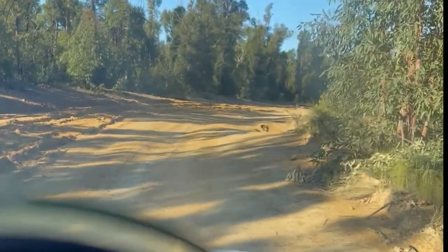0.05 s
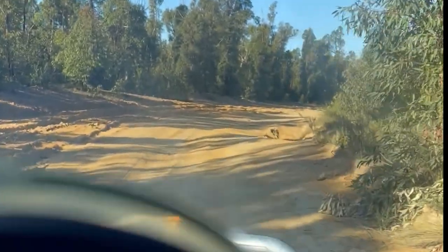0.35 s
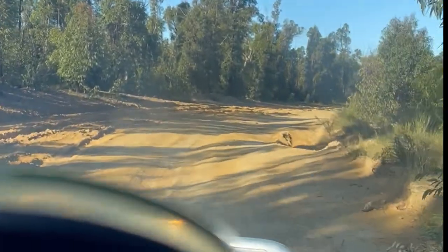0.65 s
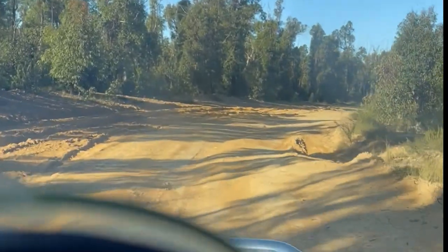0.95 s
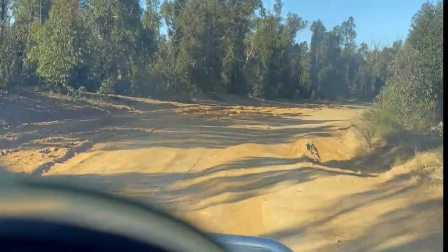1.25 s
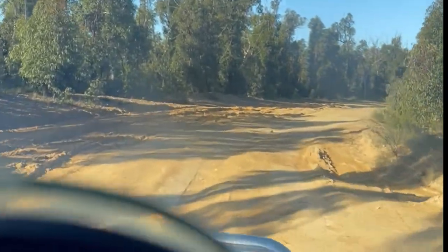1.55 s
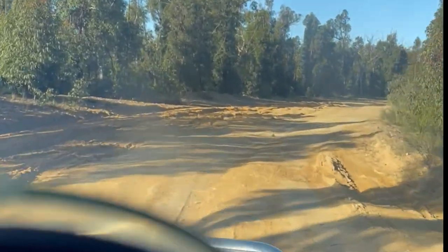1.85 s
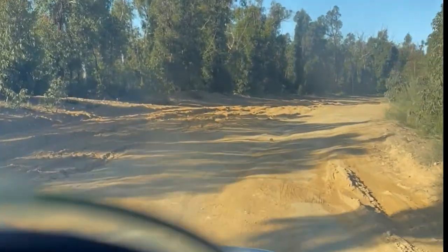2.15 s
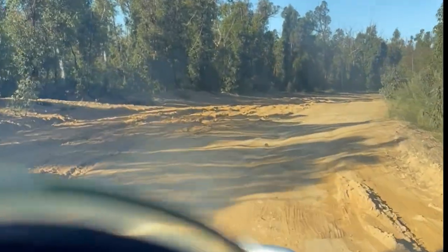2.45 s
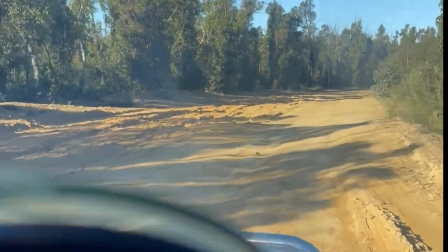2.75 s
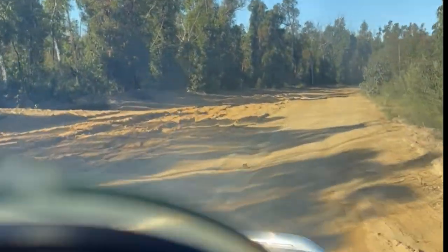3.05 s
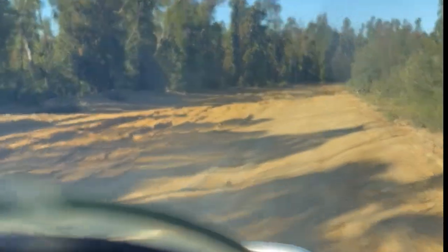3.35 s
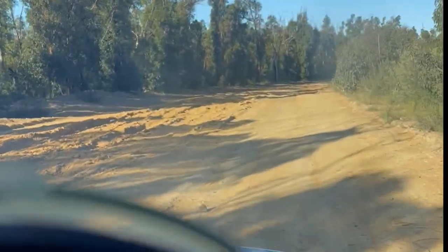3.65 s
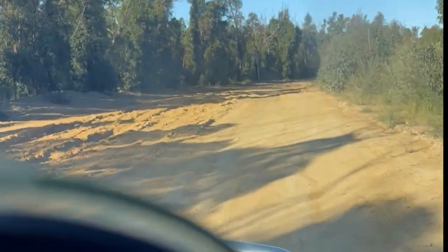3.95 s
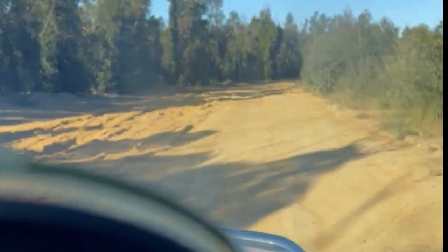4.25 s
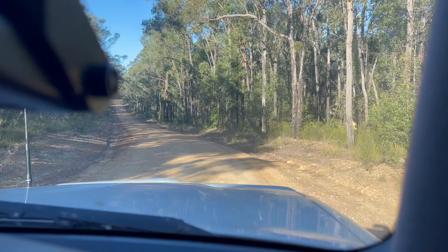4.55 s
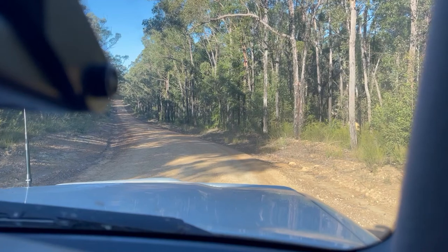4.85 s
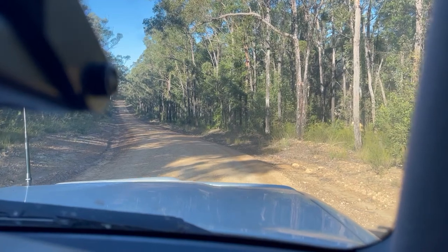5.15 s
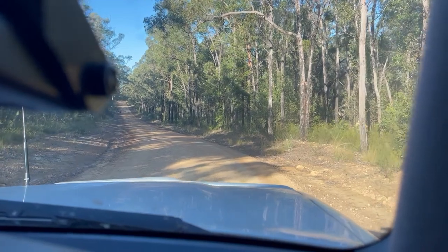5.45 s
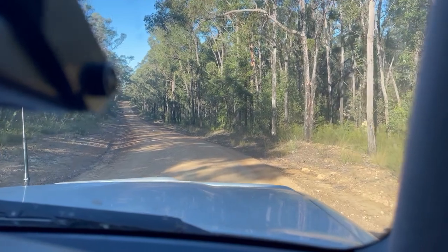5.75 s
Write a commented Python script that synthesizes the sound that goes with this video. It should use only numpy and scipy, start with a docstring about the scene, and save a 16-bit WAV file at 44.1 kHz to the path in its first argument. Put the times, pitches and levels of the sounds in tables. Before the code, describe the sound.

Heard from the driver's seat, a car rolls over a corrugated dirt road with a deep, uneven boom and a hiss of grit. A loose metal fitting clinks sharply in clusters, while plastic trim ticks, clatters and faintly squeaks and hollow parts knock and thud. After about four seconds the sound cuts to a quieter, smoother track, where the engine climbs from low revs and the suspension patters dully.

```python
"""A deep boom and a hiss of grit fill a car as its tyres roll over a corrugated dirt road.
The jolts make plastic trim tick, squeak and clatter, a loose metal fitting clink, and hollow
parts knock and thud. The scene then cuts to a smoother track, where the engine pulls up from
low revs and the suspension patters over ripples. A phone with two microphones listens from
the driver's seat."""
import sys
import numpy as np
from scipy import signal
from scipy.fft import rfft, irfft, next_fast_len
from scipy.io import wavfile
from scipy.ndimage import uniform_filter1d, map_coordinates

SR = 44100
rng = np.random.default_rng(int(sys.argv[2]) if len(sys.argv) > 2 else 0)


def bounce(signal):
    """Save signal as a 16-bit WAV file at the path given by the first command-line argument."""
    frames = np.transpose(np.atleast_2d(signal))
    limited = np.clip(frames, -1, 1)
    pcm = np.round(limited * 32767).astype(np.int16)
    wavfile.write(sys.argv[1], SR, pcm)


N = 260190


def amp(db):
    """Turn decibels into a gain."""
    return 10 ** (np.asarray(db) / 20)


def unit(x):
    """Scale a signal to an average (rms) level of 1."""
    return x / np.sqrt(np.mean(x ** 2) + 1e-20)


def along(points, hz):
    """Read between the rows of a (Hz, value) table, on a log frequency scale."""
    row_hz, values = np.transpose(points)
    return np.interp(np.log(hz + 1), np.log(row_hz + 1), values)


def curves(rows):
    """Turn each column after the time into a curve with one value per sample."""
    times, *columns = np.transpose(rows)
    return [np.interp(np.arange(N) / SR, times, column) for column in columns]


def wobble(rate):
    """A smooth curve through `rate` random values a second."""
    return map_coordinates(rng.standard_normal(int(N * rate / SR) + 4), [np.arange(N) * rate / SR])


def filtered(x, response):
    """Change the level and phase of each frequency by response(hz)."""
    size = next_fast_len(N + SR // 2)
    return irfft(rfft(x, size) * response(np.fft.rfftfreq(size, 1 / SR)), size)[..., :N]


def coloured(x, spectrum, size=8192):
    """Give a sound the tone of a spectrum; white noise keeps its level."""
    cepstrum = irfft(np.log(amp(along(spectrum, np.fft.rfftfreq(size, 1 / SR)))))
    cepstrum[1:size // 2] *= 2
    cepstrum[size // 2 + 1:] = 0  # so nothing rings ahead of a hit
    pulse = irfft(np.exp(rfft(cepstrum)))
    return signal.fftconvolve(x, pulse[None] / np.linalg.norm(pulse), axes=1)[:, :N]


def noise(spectrum, drive=1):
    """Two unrelated noises of level 1 with the given spectrum; drive makes them grainy."""
    return unit(filtered(drive * rng.standard_normal((2, N)), lambda hz: amp(along(spectrum, hz))))


def steady(x, span_s):
    """Take the slow chance swells out of a noise."""
    window = signal.windows.hann(int(span_s * SR))
    power = signal.fftconvolve(x ** 2, window[None] / window.sum(), 'same', axes=1)
    return x / np.sqrt(np.abs(power) + 1e-6)


def grains(rate, spread_db, life_s):
    """A loudness curve of tiny random impacts, about `rate` a second, each dying quickly."""
    kicks = (rng.random(N) < rate / SR) * amp(spread_db * np.minimum(rng.exponential(size=N), 3))
    return unit(np.sqrt(signal.lfilter([1], [1, -np.exp(-2 / (life_s * SR))], kicks ** 2)))


def ring(notes, t, scatter_db):
    """Two versions of a struck object's notes. A ring time (t60) is how long a 60 dB fade takes."""
    hz, db, t60 = np.transpose(notes)[:, :, None]
    strength = amp(db + scatter_db * rng.standard_normal((2, len(notes), 1)))
    phase = 2 * np.pi * rng.random((2, len(notes), 1))
    phase[0] = 0  # the first version's notes start in step
    return np.sum(strength * amp(-60 * t / t60) * np.sin(2 * np.pi * hz * t + phase), axis=1)


def crack(t, rise_s, t60, colour_db=1.5, colour_width_hz=682):
    """The brief noise of one contact, with a random tone colour of its own."""
    spectrum = rfft(rng.standard_normal((2, len(t))))
    position = np.fft.rfftfreq(len(t), 1 / SR) / colour_width_hz
    colour = map_coordinates(rng.standard_normal(size=128), [position], mode='nearest')
    burst = unit(irfft(spectrum * amp(colour_db * colour), len(t)))
    return (1 - np.exp(-t / rise_s)) * amp(-60 * t / t60) * burst


def add(track, s, sound):
    """Mix a sound into a track, starting at s seconds."""
    part = track[:, max(round(s * SR), 0):][:, :sound.shape[1]]
    part += sound[:, :part.shape[1]]


# How rough the road is. Each row: time in seconds, roughness in dB.
ROUGHNESS = [(0.0, -51.5), (0.62, -45.5), (0.96, -49.5), (1.53, -48.5), (1.66, -48.5), (1.93, -51.5),
             (2.08, -45.5), (2.91, -45), (3.13, -50), (3.35, -49), (3.58, -49.5), (3.81, -48.5),
             (3.93, -39.5), (4.17, -46), (4.28, -42.5), (4.35, -44.5)]
def road_gain(usual_db, slope):
    """A tyre sound grows by `slope` dB for each dB of roughness above the average."""
    road_db, = curves(ROUGHNESS)
    return amp(usual_db + slope * (road_db - np.mean(np.transpose(ROUGHNESS)[1])))


def swells(times, levels_db, half_width_s):
    """The power of a row of bumps over time, each a bell-shaped swell."""
    t = np.arange(N) / SR
    return sum(amp(db) ** 2 * np.exp(-2 * ((t - s) / half_width_s) ** 2)
               for s, db in zip(times, levels_db))


# The bigger bumps. Each row: time in seconds, body heave in dB, tyre thump in dB.
BUMPS = [(0.064, -16.5, -53), (.11, -13, -30), (0.265, -15.5, -24.5), (.6, -12, -26.5), (0.71, -48, -33.5),
         (1.33, -8, -40), (1.462, -33, -31.5), (1.84, -20, -42.5), (1.991, -13, -32), (2.109, -38, -25),
         (2.53, -11.5, -55), (2.799, -17, -23), (2.901, -27, -22.5), (3.162, -18.5, -20), (3.205, -22, -23),
         (3.246, -14.5, -27), (3.35, -12, -36), (3.62, -14, -32), (3.87, -34, -45.5), (3.941, -14.5, -22),
         (4.089, -34, -25), (4.23, -17, -27.5), (4.35, -38.5, -23.5)]
# The tone of the body's heave, the cabin's boom and the treads' roar.
# Each row: frequency in Hz, level in dB. Levels in all the tables are relative.
HEAVE_TONE = [(12, -28), (23, -6), (30, -2), (39, 0), (48, -3), (60, -17), (90, -45), (200, -150)]
BOOM_TONE = [(35, -43.5), (52, 3), (62, 5), (79, 7), (92, 1), (104, -6), (117, -5.5), (135, -22),
             (200, -69), (500, -150)]
ROAR_TONE = [(80, -30), (125, 0.5), (145, -1), (172, -1), (186, -8), (207, -5.5), (270, -14.5), (350, -15),
             (420, -22), (600, -27), (1000, -33), (4000, -140)]
def tyres():
    """Ridges in the road heave the body and make the cabin boom, while the treads roar."""
    times, heave_db, thump_db = np.transpose(BUMPS)
    heaves = swells(times, heave_db, half_width_s=0.022)
    thumps = swells(times, thump_db, half_width_s=0.043)
    heave = np.sqrt(road_gain(-19.5, slope=0.4) ** 2 + heaves) * steady(noise(HEAVE_TONE), span_s=0.014)
    # a thump sets the cabin booming too
    boom_gain = np.sqrt(road_gain(-15, slope=0.14) ** 2 + amp(7.5) ** 2 * thumps)
    lurch = unit(amp(2.5 * wobble(24)))  # ridges come unevenly, so the boom swells and sags
    boom = boom_gain * lurch * steady(noise(BOOM_TONE), span_s=0.12)
    tread = noise(ROAR_TONE, 1.5 + grains(rate=55, spread_db=7.5, life_s=0.01))
    roar = np.sqrt(road_gain(-27.5, slope=0.4) ** 2 + thumps) * steady(tread, span_s=0.13)
    return heave + boom + roar


# The tone of crunching dirt and of fine grit. Each row: frequency in Hz, level in dB.
CRUNCH_TONE = [(250, 5), (500, 3), (650, 7), (900, -6), (1200, -4), (1600, -9), (2200, -8), (2900, -14.5),
               (5000, -70), (10000, -120)]
GRIT_TONE = [(1000, -41), (2000, 1.5), (2900, -5.5), (3500, 7.5), (3850, 4.5), (4300, 6.5), (4800, 1),
             (6500, -2), (7200, -1), (9000, 0), (11300, -0.5), (12300, -21), (13500, -38), (16000, -54)]
# How loudly the grit hisses. Each row: time in seconds, level in dB.
GRIT_LEVEL = [(0, -65), (.11, -56.5), (.35, -61), (.68, -55.5), (1.0, -57.5), (1.6, -58), (2.15, -56),
              (2.42, -59), (2.55, -55.5), (2.92, -56.5), (3.06, -62), (3.26, -55.5), (3.57, -62.5),
              (3.75, -56), (4.17, -56.5), (4.33, -51)]
def dirt():
    """The treads crunch dirt and throw grit; the same small jolts shake both."""
    jolts = grains(rate=90, spread_db=3, life_s=0.008)
    patches = amp(0.4 * wobble(20))  # looser and firmer ground
    crunch = road_gain(-43, slope=0.63) * patches * noise(CRUNCH_TONE, 1.2 + jolts)
    grit = amp(curves(GRIT_LEVEL)[0] + 2) * noise(GRIT_TONE, 1.6 + jolts)
    return crunch + grit


# Dashboard ticks. Each row: start in seconds, level in dB, share of low clack in dB, pitch in Hz.
TICKS = [(.08, -38, 2, 6000), (0.091, -29, -4, 9300), (0.1443, -27.5, -11, 6290), (0.1935, -39, 3, 4400),
         (.2242, -37.5, 9, 4200), (0.6974, -32.5, -17, 5560), (.7348, -32, -12, 5800),
         (0.8246, -27.5, -21, 6300), (1.3152, -30.5, 5, 6580), (1.463, -36, 10, 3280),
         (1.515, -35, -16, 6400), (1.952, -25, 1, 6440), (1.97, -44, -10, 6400), (2.095, -32, 7, 6800),
         (2.531, -29.5, -6, 6300), (3.091, -34.5, -7, 5660), (3.1242, -22.5, -15, 5980),
         (3.134, -24, -2.5, 9500), (3.2, -35.5, -9, 6340), (3.289, -36, 8, 2960)]
# The tone of a tick and of a knocked panel. Each row: frequency in Hz, level in dB.
TICK_TONE = [(500, -36), (2000, -11), (3500, 0.5), (5000, 5.5), (6300, 3), (7100, -0.5), (8000, 7.5),
             (9300, 5), (11000, 1.5), (12500, -13.5), (15500, -17)]
PANEL_TONE = [(60, -51.5), (200, -28.5), (450, 2), (720, 8), (880, -0.5), (1050, 3.5), (1170, 7.5),
              (1275, -3), (1390, 1), (1510, 1), (1750, -2), (1915, -4), (3000, -9.5), (16000, -84.5)]
def dashboard_ticks(rise_s=0.0016):
    """Plastic joints tick as the dashboard flexes; they give way softly and hardly ring."""
    cracks, notes, clacks = np.zeros((3, 2, N))
    t = np.arange(SR // 12) / SR
    rise = 1 - np.exp(-t / rise_s)
    for s, db, clack_db, hz in TICKS:
        burst = crack(t, rise_s, t60=0.033)
        add(cracks, s, amp(db - 4.5) * burst)
        add(clacks, s, amp(db + clack_db - 4.5) * burst)
        add(notes, s, amp(db - 8.5) * rise * ring([(hz, 0, 0.02)], t, scatter_db=1.5))
    return coloured(cracks, TICK_TONE) + notes + coloured(clacks, PANEL_TONE)


# Squeaks. Each row: middle in seconds, level in dB, slips per second, length in seconds.
SQUEAKS = [(0.211, -56, 2200, 0.046), (0.542, -59.5, 2010, 0.06), (2.911, -50, 2206, 0.036),
           (3.631, -55.5, 2160, 0.033), (3.906, -52, 2200, 0.022), (3.997, -48.5, 2260, 0.024),
           (4.03, -47.5, 2205, 0.014), (4.093, -52, 2170, 0.019), (4.129, -54, 2196, 0.042)]
# A squeak's overtones: the level in dB at one, two and three times the slip rate.
SQUEAK_HARMONICS = [0.5, 1, -4.5]
def trim_squeaks():
    """Plastic trim sticks and slips for a moment: a rough chirp with overtones."""
    out = np.zeros((2, N))
    for s, db, hz, length_s in SQUEAKS:
        n = int(length_s * SR)
        waver = unit(uniform_filter1d(rng.standard_normal((2, SR // 4)), size=50, axis=1))[:, :n]
        phase = 2 * np.pi * np.cumsum(hz * (1 + 0.026 * waver), axis=1) / SR
        tone = sum(amp(level) * np.sin(k * phase) for k, level in enumerate(SQUEAK_HARMONICS, 1))
        add(out, s - length_s / 2, amp(db + 3.5) * signal.windows.hann(n) * unit(tone))
    return out


# Clatters. Each row: start in seconds, level in dB, seconds before it fades, share of sizzle in dB.
CLATTERS = [(.556, -48, 0.0038, -24), (.625, -40, 0.018, -10), (1.042, -34, 0.027, 1),
            (1.153, -49, 0.02, 8.5), (1.236, -38, 0.0048, -15), (1.358, -28, 0.002, -1),
            (1.46, -41, 0.0082, -11), (1.623, -35, 0.015, -5), (1.858, -42, 0.0044, -40),
            (2.017, -33.5, 0.0017, -12.5), (2.064, -41.5, 0.0048, -13), (2.143, -31.5, 0.0041, -17.5),
            (2.214, -47.5, 0.01, -11), (2.776, -35, 0.012, -13), (3.143, -28.5, 0.021, -3),
            (3.19, -40.5, 0.028, -5), (3.296, -44, 0.0045, -9), (3.371, -25.5, 0.017, -23),
            (3.434, -30.5, 0.022, -12), (3.905, -34.5, 0.0061, -10), (3.989, -44.5, 0.0075, -5.5),
            (4.028, -40, 0.0085, -16), (4.085, -44, 0.0056, -6), (4.212, -33, 0.0034, -15),
            (4.272, -46, 0.0058, -11), (4.305, -30.5, 0.0049, -6.5)]
# The tone of that bright sizzle. Each row: frequency in Hz, level in dB.
SIZZLE_TONE = [(500, -42), (1500, -16), (2600, 3.5), (3500, 3), (4400, 4.5), (5500, 3), (7000, 2),
               (8000, 4.5), (9500, 0.5), (11300, 3.5), (13000, -17.5), (15500, -39.5)]
def trim_clatter(rise_s=0.00037, t60=0.057):
    """A jolted panel chatters against its frame for a moment, then dies away."""
    knocks, sizzle = np.zeros((2, 2, N))
    t = np.arange(SR // 6) / SR
    for s, db, hold_s, sizzle_db in CLATTERS:
        swell = (1 - np.exp(-t / rise_s)) * amp(db - 60 * np.maximum(t - hold_s, 0) / t60)
        chatter = swell * rng.standard_normal((2, len(t)))
        add(knocks, s, chatter)
        add(sizzle, s, amp(sizzle_db) * chatter)
    contacts = unit(0.8 + grains(rate=500, spread_db=2.5, life_s=0.0015))
    panel = amp(-1.4) * coloured(knocks * contacts, PANEL_TONE)
    return panel + amp(-2.5) * coloured(sizzle * contacts, SIZZLE_TONE)


# Metal clinks. Each row: start in seconds, level in dB, share of low clack in dB,
# pitch in Hz of the spot that is struck, share of ring in dB.
CLINKS = [(.944, -30.5, -2, 3720, -1), (.965, -23.5, 5, 7730, -3), (1.0414, -10, -5, 4540, -1),
          (1.0662, -11.5, -18, 3530, 2), (1.137, -26, -8, 5130, 2.5), (1.1504, -14.5, -7.5, 3480, -3.5),
          (1.205, -22, -12, 4730, -11), (1.358, -20, 9, 3570, -1), (1.403, -26, -12, 3330, -2),
          (1.6232, -13, -5, 3600, 1.5), (1.679, -21.5, -10, 5330, -3.5), (1.706, -25.5, -4.5, 4900, -8),
          (1.7208, -13, -15, 4970, -6), (2.2128, -16, -2, 3370, -5.5), (2.24, -20, -8, 3600, -1.5),
          (2.317, -25.5, -28, 2900, 6), (2.334, -26, -15, 3430, -5), (2.759, -36, 11, 3320, 2),
          (2.777, -13.5, -9, 4470, -2.5), (2.8025, -20.5, -1.5, 3390, -0.5), (2.819, -31, -6, 3520, -7),
          (2.8318, -13, -7, 7700, -1), (3.372, -37, 7.5, 3300, -7), (3.3908, -13.5, -2.5, 4270, -2),
          (3.408, -26, -10, 5000, 2), (3.422, -23.5, 1, 3400, 1), (3.477, -31, -6, 7700, -9),
          (3.486, -17.5, -9, 2930, -9.5), (3.506, -23.5, 0, 3540, -4.5)]
# The fitting's own notes. Each row: pitch in Hz, level in dB, ring time in seconds.
FITTING_NOTES = [(2910, -22, .019), (3465, -8.5, 0.041), (3410, -8, 0.045), (3690, -15.5, 0.084),
                 (4350, -7, .018), (4400, -5, 0.033), (4680, 4, 0.011), (4920, -1, .014), (6320, -14, .04),
                 (7720, -8, 0.021), (11120, -20, 0.02)]
# The tone of its sharp crack. Each row: frequency in Hz, level in dB.
CRACK_TONE = [(300, -59), (1500, -31), (2600, -4), (3400, -1), (3950, -2.5), (4500, 1.5), (5300, 8.5),
              (6900, -11), (7700, 3), (9500, -5.5), (11300, -2.5), (13000, -16), (15500, -15)]
def loose_fitting(rise_s=0.0006, bounce_gap_s=0.0082, bounce_loss_db=9):
    """A loose metal part strikes and bounces: a crack, a short ring and a clack of its mount."""
    cracks, rings, clacks = np.zeros((3, 2, N))
    t = np.arange(SR // 8) / SR
    rise = 1 - np.exp(-t / rise_s)
    for s, db, clack_db, hz, ring_db in CLINKS:
        burst = crack(t, rise_s, t60=0.02)
        add(cracks, s, amp(db - 9.5) * burst)
        add(clacks, s, amp(db + clack_db - 7.5) * burst)
        detune = 1 + 0.014 * rng.standard_normal()  # the part never sits the same way twice
        notes = ring(FITTING_NOTES + [(hz, 6, 0.015)], detune * t, scatter_db=3)
        add(rings, s, amp(db + ring_db - 12.5) * rise * notes)
        bounce_times = np.cumsum(bounce_gap_s * (0.5 + rng.random(size=4)))
        for k, delay_s in enumerate(bounce_times, 1):
            tap = crack(t, rise_s=0.0002, t60=0.008)
            add(cracks, s + delay_s, amp(db - 7 - k * bounce_loss_db) * tap)
    return coloured(cracks, CRACK_TONE) + rings + coloured(clacks, PANEL_TONE)


# Knocks on the box. Each row: start in seconds, level in dB, most strongly struck pitch in Hz.
KNOCKS = [(1.361, -21, 1020), (3.151, -30, 1100), (3.216, -29, 1250), (3.374, -16.5, 810),
          (3.386, -19.5, 1300), (3.437, -18.5, 1270), (3.448, -16.5, 1020), (3.808, -31.5, 900),
          (3.906, -39, 1000), (3.916, -32.5, 2000), (3.983, -28.5, 900), (4.102, -34, 790),
          (4.213, -32, 2040), (4.222, -34.5, 1500), (4.273, -33, 1090), (4.311, -31, 800),
          (4.339, -29, 1100)]
# The box's own notes. Each row: pitch in Hz, level in dB, ring time in seconds.
BOX_NOTES = [(752, -1, 0.067), (844, -1.5, .035), (1032, -5, 0.045), (1090, -7, .05), (1242, -4, 0.035),
             (1520, -5.5, .03), (1957, -1.5, 0.022), (2280, 2, .018)]
def plastic_box(drop_db_per_octave=14):
    """Hard jolts knock a hollow plastic box; where it is struck decides which notes stand out."""
    out = np.zeros((2, N))
    t = np.arange(SR // 8) / SR
    rise = 1 - np.exp(-t / 0.0015)
    for s, db, struck_hz in KNOCKS:
        notes = [(hz, level - drop_db_per_octave * abs(np.log2(hz / struck_hz)), t60)
                 for hz, level, t60 in BOX_NOTES]
        add(out, s, amp(db - 2) * rise * ring(notes, t, scatter_db=5.5))
    return out


# Thuds. Each row: loudest moment in seconds, level in dB, pitch in Hz, half width in seconds.
THUDS = [(2.126, -26.5, 328, 0.012), (2.814, -38.5, 287, .01), (2.897, -17, 333, 0.012),
         (3.385, -32, 348, 0.01), (3.645, -32, 360, 0.032), (4.102, -16.5, 254.6, 0.0093),
         (4.317, -30.5, 303, .008)]
def panel_thuds(tail_db=-7.5, t60=0.2):
    """Big bumps flex a hollow panel: a few low cycles swell and stop, leaving a weak ring."""
    out = np.zeros((2, N))
    t = np.arange(-SR // 12, SR // 4) / SR
    for s, db, hz, half_width_s in THUDS:
        tail = np.where(t > 0, amp(tail_db - 60 * t / t60), 0)
        swell = np.maximum(np.exp(-(t / half_width_s) ** 2), tail)
        note = np.sin(2 * np.pi * (hz * t + rng.random((2, 1))))
        add(out, s + t[0], amp(db - 0.5) * swell * note)
    return out


# The engine pulling. Each row: time in seconds, firings per second, level in dB.
REVS = [(4.42, 41.0, -40), (4.672, 42.4, -48), (4.706, 44, -32), (4.985, 52.27, -24), (5.094, 55.6, -37),
        (5.154, 58, -26.5), (5.303, 62.62, -32.5), (5.74, 69.1, -25.5), (5.756, 68.76, -35),
        (5.88, 71.1, -24)]
def engine():
    """The firing note and its octave climb as the car gathers speed."""
    hz, db = curves(REVS)
    phase = 2 * np.pi * np.cumsum(hz * (1 + 0.014 * wobble(14))) / SR
    note = np.sin(phase) + amp(-14) * np.sin(2 * phase)
    shared_only = np.array([[1], [0]])  # only in the version both microphones share
    return amp(db + 2.3 * wobble(32)) * unit(note) * shared_only


# The tone of the rolling noise and of the faint hiss. Each row: frequency in Hz, level in dB.
ROLL_TONE = [(15, -31), (27, 6), (38, 15), (70, 6.5), (110, 2), (170, -3), (230, -4.5), (340, -8.5),
             (420, -17.5), (620, -19.5), (850, -28), (1100, -26), (1400, -37), (1950, -36.5), (2800, -45),
             (7000, -51), (16000, -87.5)]
HISS_TONE = [(1200, -20), (2500, -9.5), (5000, -10), (7500, -6.5), (9000, -3), (10500, -2), (11600, -4.5),
             (12600, -25), (15000, -45.5)]
# How loud that hiss is. Each row: time in seconds, level in dB.
HISS_LEVEL = [(4.42, -65.5), (4.48, -63.5), (4.62, -65.5), (4.86, -69), (5.02, -80), (5.12, -69.5),
              (5.27, -71), (5.32, -63.5), (5.42, -61), (5.555, -68), (5.62, -58.5), (5.67, -60.5),
              (5.785, -76.5), (5.88, -76)]
def smooth_track(roll_db=-33, db_per_doubling=3.5):
    """Quiet rolling noise that grows with speed, and a faint grainy hiss that comes and goes."""
    firing_hz, _ = curves(REVS)
    hiss_db, = curves(HISS_LEVEL)
    relative_speed = firing_hz / np.mean(np.transpose(REVS)[1])
    roll_gain = amp(roll_db + db_per_doubling * np.log2(relative_speed))
    roll = steady(noise(ROLL_TONE), span_s=0.045)
    hiss = noise(HISS_TONE, 3 + grains(rate=140, spread_db=5.5, life_s=0.0046))
    return roll_gain * roll + amp(hiss_db + 5.5) * hiss


# Ripples and ruts in the track. Each row: start in seconds, level in dB.
RUTS = [(4.435, -40), (4.477, -37.5), (4.529, -35), (4.614, -37), (4.671, -37), (4.726, -33.5),
        (4.772, -36), (4.824, -36), (4.855, -38), (4.884, -34), (4.922, -30.5), (4.964, -32),
        (5.012, -34.5), (5.056, -33), (5.111, -32), (5.221, -29.5), (5.308, -31), (5.344, -33.5),
        (5.433, -29), (5.593, -39), (5.684, -29.5)]
# The car body's own notes. Each row: pitch in Hz, level in dB, ring time in seconds.
BODY_NOTES = [(254, -13, 0.016), (319, 5, 0.038), (378, -12.5, 0.016), (570, 2, 0.014), (717, -14.5, 0.036),
              (1070, -27, .017)]
def suspension(tap_t60=0.05):
    """Each ripple or rut sends a dull knock through the body; harder ones have a brighter edge."""
    body, taps = np.zeros((2, 2, N))
    t = np.arange(SR // 8) / SR
    rise = 1 - np.exp(-t / 0.0026)
    average_db = np.mean(np.transpose(RUTS)[1])
    for s, db in RUTS:
        detune = 1 + 0.05 * rng.standard_normal()
        add(body, s, amp(db + 5.5) * rise * ring(BODY_NOTES, detune * t, scatter_db=1.7))
        edge = amp(db - 18 + 0.27 * (db - average_db))
        add(taps, s, edge * rise * amp(-60 * t / tap_t60) * rng.standard_normal((2, len(t))))
    return body + coloured(taps, PANEL_TONE)


# How long the cabin echoes. Each row: frequency in Hz, ring time in seconds.
ECHO_TIMES = [(300, 0.044), (3000, 0.12), (12000, 0.12)]
def cabin_echo(x):
    """The short, dense echo of glass and upholstery."""
    hz, t, spectra = signal.stft(rng.standard_normal((2, SR // 4)), SR, nperseg=256)
    fade = amp(-60 * t / along(ECHO_TIMES, hz)[:, None])
    _, tail = signal.istft(spectra * fade, SR, nperseg=256)
    tail = np.pad(tail, ((0, 0), (SR // 400, 0)))  # the echo arrives 2.5 ms late
    return signal.fftconvolve(x, tail / np.linalg.norm(tail[0]), axes=1)[:, :N]


# How alike the two microphones sound. Each row: frequency in Hz, likeness from 0 to 1.
LIKENESS = [(60, 1), (150, 1), (250, 0.98), (370, 0.83), (520, 0.044), (800, 0.42), (1200, 0.052),
            (1750, 0.99), (2800, 0.078), (4500, 0.57), (6000, 0.98), (12000, 1)]
# Which side is louder. Each row: frequency in Hz, left minus right in dB.
BALANCE = [(100, -.4), (200, -1.3), (320, -2.6), (520, -.7), (1000, .8), (1800, .3), (2700, -.7),
           (3400, -4), (4300, -.7), (8000, 0)]
# How far left runs ahead of right on each road. Each row: frequency in Hz, lead in half cycles.
LEAD_ROUGH = [(2000, 0), (4000, .25), (4900, 1), (6000, 2), (9200, 3), (12300, 4), (13300, 4), (15200, 5)]
LEAD_SMOOTH = [(2000, 0), (3000, -.2), (7500, -.4), (8800, 0), (10300, 1), (11900, 2)]
def microphones(pair, lead):
    """Blend two versions of a sound into left and right: one is shared, one sets the sides apart."""
    def blend(hz):
        angle = np.arccos(np.clip(along(LIKENESS, hz), -1, 1)) / 2
        return np.array([np.cos(angle), np.sin(angle)])

    def skew(hz):
        side = np.array([[0.5], [-0.5]])
        return amp(side * along(BALANCE, hz)) * np.exp(1j * np.pi * side * along(lead, hz))

    shared, apart = filtered(pair, blend)
    return filtered(np.array([shared + apart, shared - apart]), skew)


def scene(cut_s=4.383):
    """The rough road, then a sudden cut, with a sharp pop, to the smooth track."""
    rattles = loose_fitting() + dashboard_ticks() + trim_clatter() + plastic_box() + trim_squeaks()
    road = tyres() + dirt() + panel_thuds()
    rough = microphones(road + rattles + amp(-8) * cabin_echo(rattles), LEAD_ROUGH)
    smooth = microphones(engine() + smooth_track() + suspension(), LEAD_SMOOTH)
    until_cut_s = cut_s - np.arange(N) / SR
    pop = np.exp(-np.abs(until_cut_s) / 0.00057)
    return np.where(until_cut_s > 0, (1 - pop) * rough + amp(-13.5) * pop, smooth)


def record(dry):
    """The phone keeps nothing above 15800 Hz."""
    return filtered(dry, lambda hz: hz < 15800)


dry = scene()
out = record(dry)
bounce(out)
```